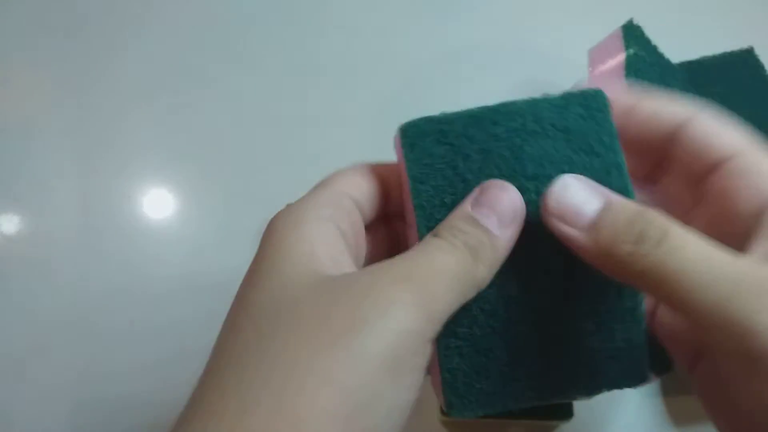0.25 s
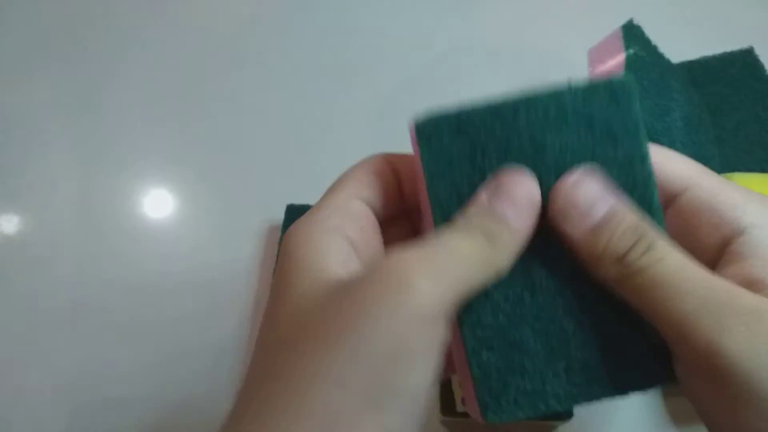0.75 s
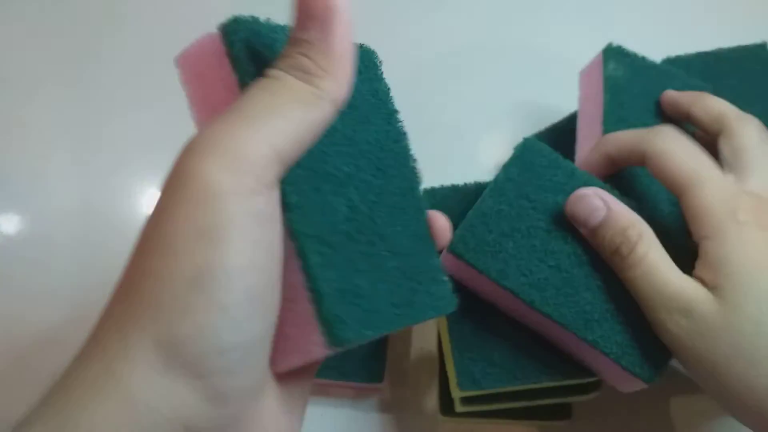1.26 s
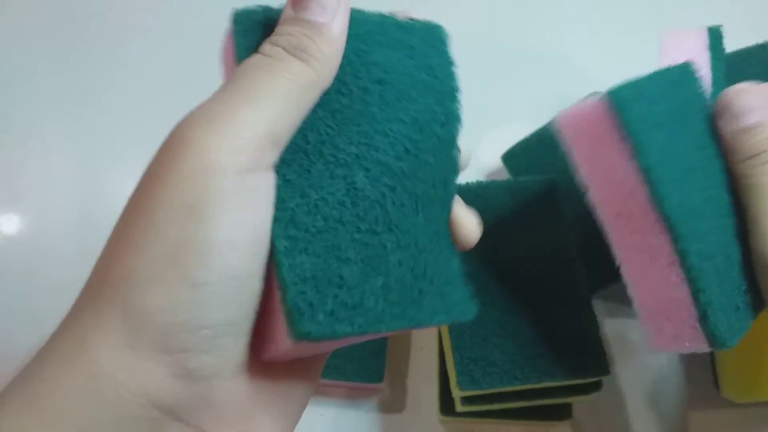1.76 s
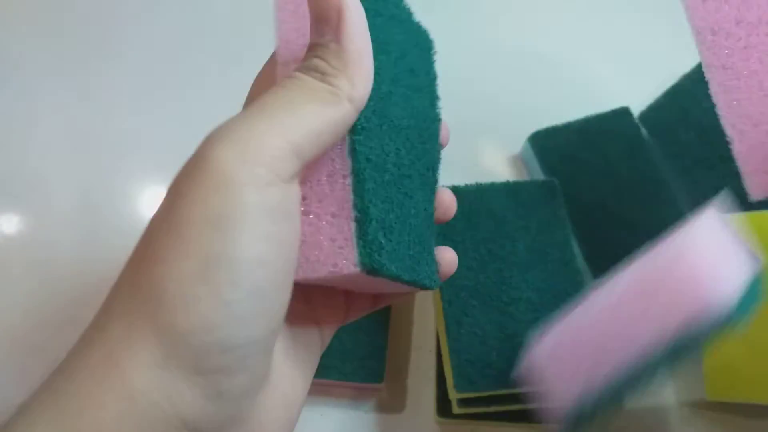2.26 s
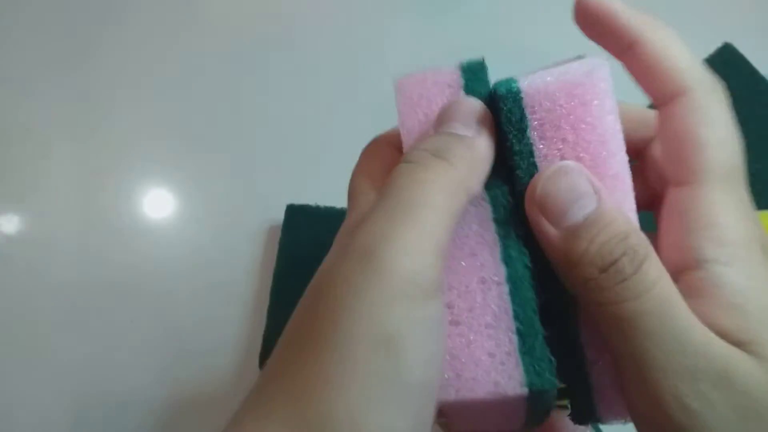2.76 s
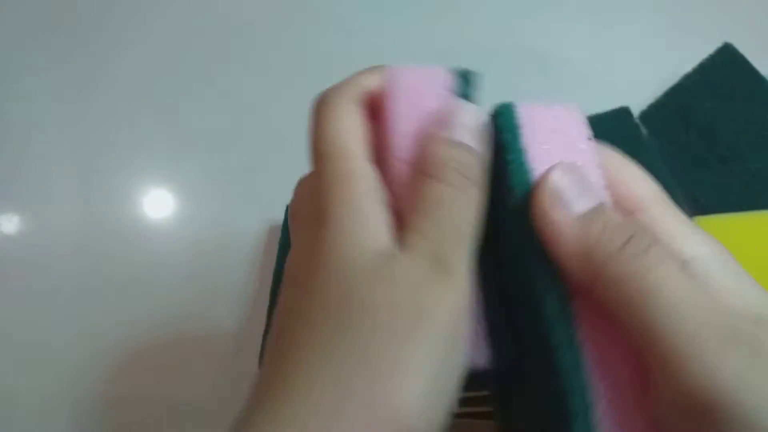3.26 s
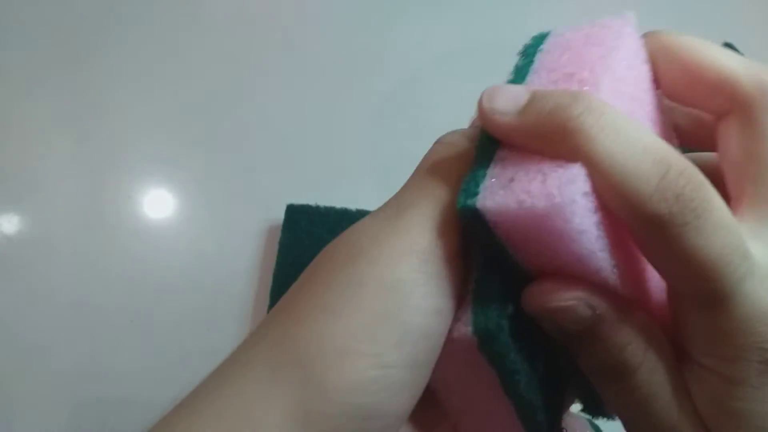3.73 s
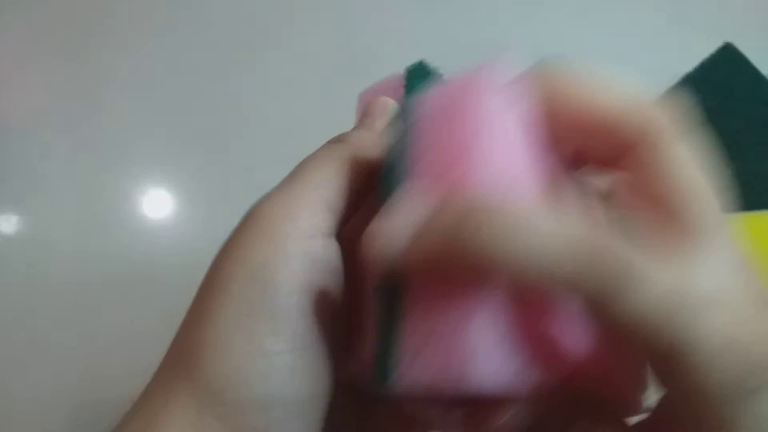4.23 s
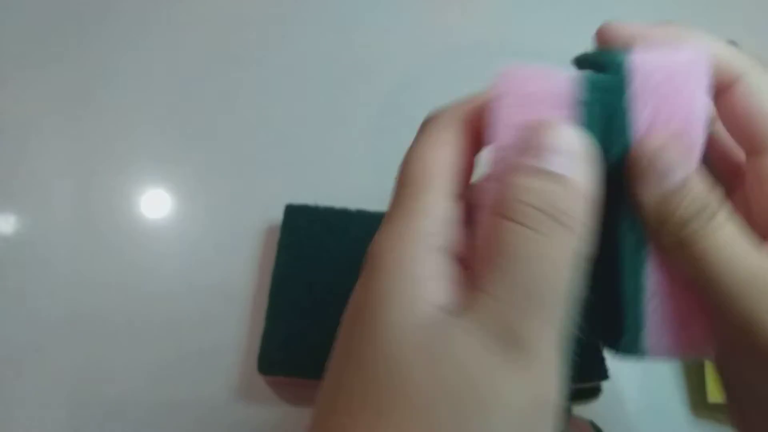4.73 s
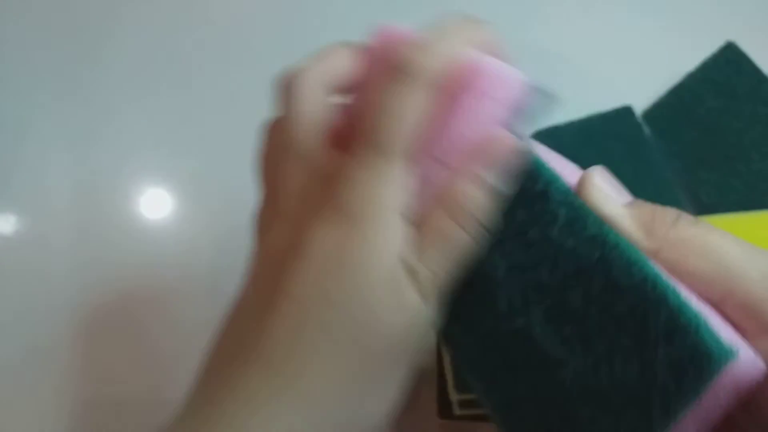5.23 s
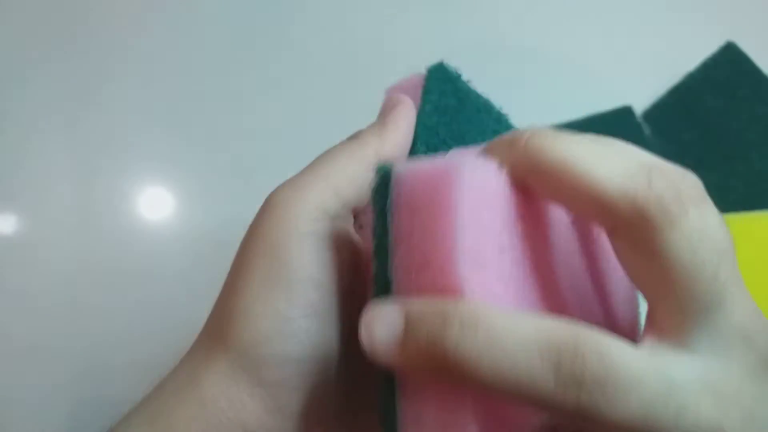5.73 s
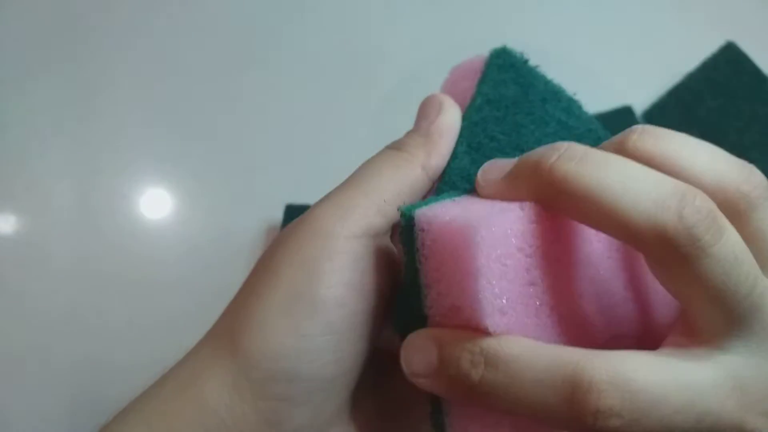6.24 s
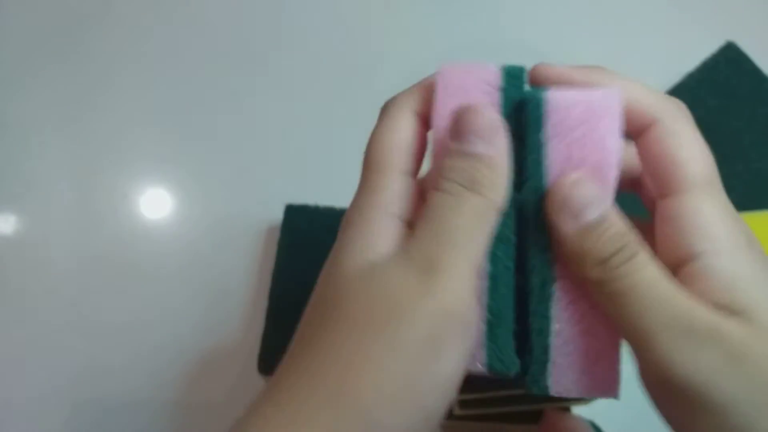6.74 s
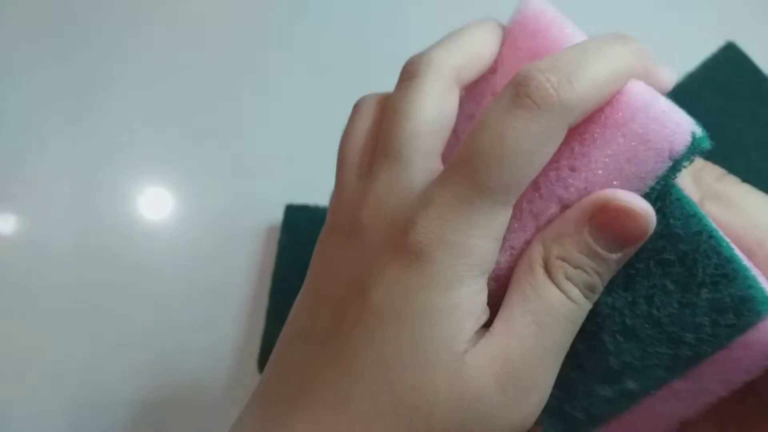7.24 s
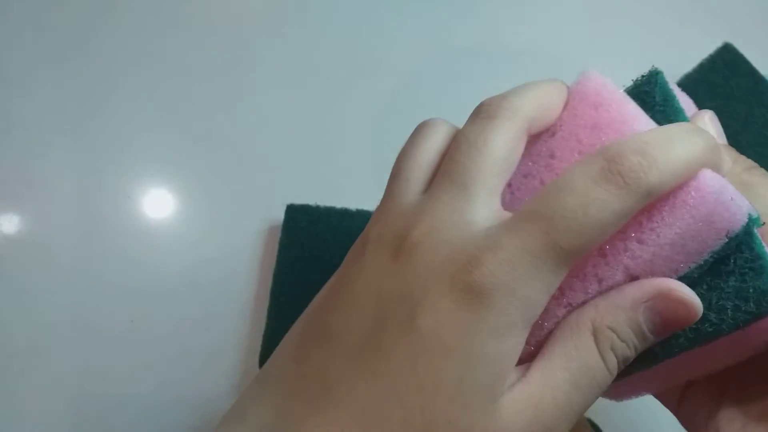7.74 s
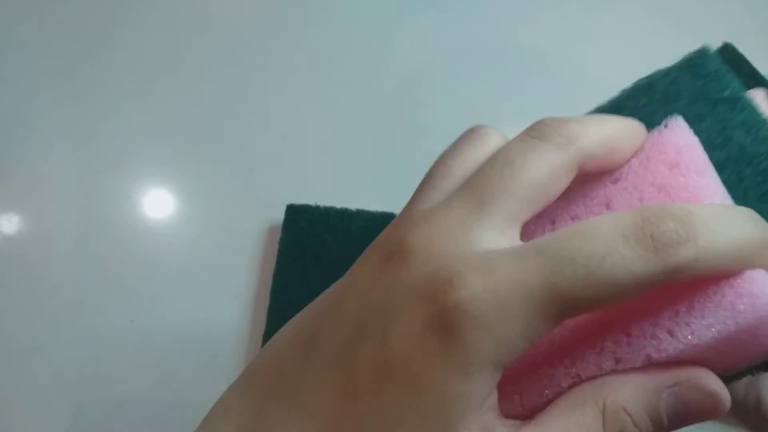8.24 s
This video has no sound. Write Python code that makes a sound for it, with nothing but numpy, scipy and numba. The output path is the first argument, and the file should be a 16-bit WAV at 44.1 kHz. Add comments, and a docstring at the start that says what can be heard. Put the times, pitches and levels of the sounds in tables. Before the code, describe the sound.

Close to the microphone in a small hard room, scrub sponges are handled with a quiet, dry rustle and some dull knocks. After about three seconds, two rough pads start scraping against each other, much louder, in quick uneven strokes. Fast rubs give a dense scratch, while the slower ones near the end break into crisp crackles. A faint ventilation rumble lies underneath.

```python
"""A small hard room, a phone microphone close to two kitchen sponges: they are picked up, pressed
together and rubbed, scouring side on scouring side. Stiff fibres catch and snap free: single ticks when
slow, a dense scratch when fast; the foam adds a hollow body. Fingers brush and bump the sponges now and
then. The room answers faintly, over ventilation rumble, a low hum and a thin whine."""
import sys
import numpy as np
from scipy import signal
from scipy.fft import rfft, irfft
from scipy.io import wavfile
from numba import njit

SR = 44100
rng = np.random.default_rng(int(sys.argv[2]) if len(sys.argv) > 2 else 0)


def put_to_file(sound):
    """Save the sound as 16-bit audio at rate SR, in the file named by the first command-line argument."""
    columns = np.atleast_2d(sound).T  # one column per channel
    safe = np.clip(columns, -1, 1)
    whole_steps = np.round(safe * 32767)
    wavfile.write(sys.argv[1], SR, whole_steps.astype(np.int16))


N = 374409
TIME = np.arange(N) / SR


def undb(db):
    """Decibels to gain."""
    return np.exp(np.asarray(db) * np.log(10) / 20)


def unit(x):
    """Scale to rms 1."""
    return x / np.sqrt(np.mean(x ** 2))


def walk(rate):
    """Random drift that turns about rate times a second; rms 1."""
    return unit(np.interp(TIME * rate, np.arange(N), rng.standard_normal(N)))


def lowpass(x, hz, order=2):
    """Butterworth low-pass."""
    return signal.sosfilt(signal.butter(order, hz, fs=SR, output="sos"), x)


@njit
def bandpass(x, hz, width_hz):
    """State-variable band-pass with a moving centre, gain 1 there."""
    y, band_state, low_state = np.empty(len(x)), 0., 0.
    for i in range(len(x)):
        g, damping = np.tan(np.pi * hz[i] / SR), width_hz / hz[i]
        band = (band_state + g * (x[i] - low_state)) / (1 + g * (g + damping))
        band_state = 2 * band - band_state
        low_state += 2 * g * band
        y[i] = damping * band
    return y


def shelf(x, hz, below_db, above_db):
    """Separate gains below and above a frequency."""
    below = lowpass(lowpass(x, hz, order=3)[::-1], hz, order=3)[::-1]
    return below * undb(below_db) + (x - below) * undb(above_db)


def colour(x, points, size=4096):
    """Ring x through the causal, unit-energy response of a spectrum."""
    hz, db = np.transpose(points)
    bin_hz = np.maximum(np.arange(size // 2 + 1) * SR / size, 1)
    gain = undb(np.interp(np.log(bin_hz), np.log(hz), db))
    cepstrum = irfft(np.log(gain))
    cepstrum[1:size // 2] *= 2  # fold to minimum phase
    cepstrum[size // 2 + 1:] = 0
    response = irfft(np.exp(rfft(cepstrum)))
    return signal.oaconvolve(x, response / np.linalg.norm(response))[:N]


def swell(s, rise_s, hold_s, release_s, sag_db_per_s=7):
    """Level in dB that peaks at s, sags while held, then dies away; rise and release each span 20 dB."""
    early = np.maximum(s - TIME, 0) / rise_s
    late = np.maximum(TIME - s - hold_s, 0) / release_s
    return -20 * (early ** 1.42 + late ** 1.26) - sag_db_per_s * np.clip(TIME - s, 0, hold_s)


# Room tone from the ventilation. Each row: frequency in Hz, relative level in dB.
VENTILATION_SPECTRUM = [(15, -44), (25, -4), (269, 0), (425, -10), (500, -14), (672, -9), (905, -11.5),
                        (1220, -14.5), (1320, -17.5), (1430, -18), (2150, -19), (3880, -21.5), (5090, -27),
                        (7220, -29), (15800, -38.5)]


def ventilation():
    """Moving air fills the room with a rumble and a faint hiss."""
    return colour(rng.standard_normal(N), VENTILATION_SPECTRUM) * undb(-50.5 + 0.4 * walk(4.8))


# A low hum behind the sponges. Each row: peak time in seconds, level in dB, then rise, hold and
# release in seconds.
HUM_SWELLS = [(.85, -52, .5, .75, .2), (4.15, -52.5, .25, 0.56, .35), (4.85, -51.5, .25, .35, .35)]


def hum():
    """A wavering low hum comes and goes under a soft, unsteady drone."""
    low_db = np.max([db + swell(s, *shape) for s, db, *shape in HUM_SWELLS], axis=0)
    low_hz = 56.5 + 1.3 * walk(9)
    low = np.sin(2 * np.pi * np.cumsum(low_hz) / SR) * undb(low_db + 1.5 * walk(6.9))
    drone_hz = 157 + 6 * walk(25)
    drone = np.sin(2 * np.pi * np.cumsum(drone_hz) / SR) * undb(-59 + 5.8 * walk(11))
    return low + drone


# A whine far down in the room tone. Each row: frequency in Hz, rms level in dB.
WHINE_TONES = [(8258, -85), (8559, -85), (8856, -85), (9157, -84), (9518, -85), (9814, -84), (10115, -83),
               (10411, -84), (10713, -83), (11014, -85), (11310, -85), (11612, -86), (14664, -89),
               (15262, -88)]


def whine():
    """Steady high tones merge into one thin whine."""
    return sum(np.sqrt(2) * undb(db) * np.sin(2 * np.pi * (hz * TIME + rng.random()))
               for hz, db in WHINE_TONES)


def room(x, t60_s, wet_db, dull_hz, build_s):
    """The hard walls send a diffuse, duller echo back to the microphone."""
    age = TIME[:SR]
    envelope = undb(-60 * age / t60_s) * (1 - np.exp(-age / build_s))
    tail = lowpass(rng.standard_normal(SR) * envelope, dull_hz)
    return undb(wet_db) * signal.oaconvolve(x, tail / np.linalg.norm(tail))[:N]


# The ring of a bump. Each row: frequency in Hz, relative level in dB, seconds to fall 60 dB.
BUMP_MODES = [(78, -23, .08), (163, 6, 0.024), (338, -4, 0.027), (546, 8, 0.033), (800, 16, 0.02),
              (1170, 15, 0.019)]
# Soft bumps near the microphone. Each row: start in seconds, peak level in dB, treble cutoff in Hz.
BUMPS = [(0.243, -35, 131), (2.229, -27.5, 1250), (2.538, -26, 423), (2.597, -29, 260), (3.94, -29, 105),
         (4.310, -37, 300)]


def bumps():
    """Fingers and sponges knock together; the softer the contact, the fewer modes it reaches."""
    out, age = np.zeros(N), TIME[:SR // 5]
    ring = sum(undb(db - 60 * age / t60) * np.sin(2 * np.pi * hz * age) for hz, db, t60 in BUMP_MODES)
    for s, db, cutoff_hz in BUMPS:
        knock = lowpass(ring, cutoff_hz, order=4)
        out[int(s * SR):][:len(age)] += undb(db) * knock / np.abs(knock).max()
    return out


def fibres(per_s, scatter_db):
    """Random fibre releases of uneven size, with mean power 1 at any rate."""
    chance = np.clip(per_s / SR, 1 / SR, 1)
    released = rng.random(N) < chance
    return unit(released * undb(scatter_db * rng.standard_normal(N)) / np.sqrt(chance))


def sliding(level_db, per_s, growth_db, clump_db, smooth_db):
    """Faster sliding frees more fibres and runs evenly; slow sliding sticks and frees them in clumps."""
    speed = undb(growth_db * (level_db + 29.5) / 10)  # 1 at an ordinary stroke
    depth_db = clump_db * (0.32 + 0.61 / (1 + (speed * undb(smooth_db)) ** 4))
    catch_db = depth_db * unit(walk(600) + 0.34 * walk(170))
    clumps = undb(catch_db - depth_db ** 2 * np.log(10) / 20)  # clumping keeps the mean power
    return fibres(per_s * speed, scatter_db=3.5) * clumps * undb(level_db)


def bursts(rows, rise_s, gain_db):
    """Envelope of short avalanches of fibres: quick rise, brief hold, fast end."""
    power = np.zeros(N)
    for s, db, length_s in rows:
        age = TIME[:min(SR // 5, N - int(s * SR))]
        shape = (1 - np.exp(-age / rise_s)) * np.exp(-(age / length_s) ** 2)
        power[int(s * SR):][:len(age)] += (undb(db + gain_db) * shape) ** 2
    return np.sqrt(power)


# Tiny creaks, close up. Each row: start in seconds, relative level in dB, length in seconds, pitch in Hz.
CREAKS = [(0.851, -39, .004, 2730), (1.15, -31.5, 0.0035, 2930), (1.83, -45.5, 0.033, 2770),
          (7.395, -26, .004, 2700), (7.413, -33.5, 0.01, 1600)]


def creaks():
    """A bundle of fibres judders through one narrow resonance."""
    out, judder = np.zeros(N), fibres(12000, scatter_db=5)
    for s, db, length_s, hz in CREAKS:
        ring = unit(bandpass(judder, np.full(N, float(hz)), width_hz=300.0))
        out += ring * bursts([(s, db, length_s)], rise_s=0.0013, gain_db=-3.5)
    return out


# Fingertip scratch and skin brush, heard close. Each row: frequency in Hz, relative level in dB.
SCRATCH_SPECTRUM = [(60, -3), (200, -9.5), (800, -1.5), (1600, -7.5), (2300, -4), (3000, -1), (3700, -3.5),
                    (4500, -4), (5800, -15.5), (15800, -50)]
SKIN_SPECTRUM = [(4500, -20), (6500, -1.5), (8000, 4), (11000, 0.5), (15800, -8), (18000, -40)]
# A finger shifts on one sponge. Each row: peak time in seconds, relative scratch level in dB, rise and
# release in seconds, relative skin level in dB.
FINGER_SHIFTS = [ (0.0, -53.5, .02, .06, -64), (0.11, -58, 0.055, .06, -66), (0.21, -59, .06, 0.074, -67),
                 (0.29, -51, .012, .015, -70), (0.365, -49, 0.013, .045, -66),
                 (0.53, -56.5, 0.066, .14, -56.5), (0.84, -49, 0.12, 0.056, -58),
                 (0.997, -45.5, 0.033, 0.045, -68), (1.063, -52.5, 0.024, 0.041, -78),
                 (1.138, -50.5, 0.027, 0.035, -78), (1.265, -53.5, 0.093, 0.082, -65),
                 (1.42, -51, 0.068, .065, -63), (1.5, -55.5, .04, 0.1, -66), (1.62, -50, 0.035, 0.1, -66),
                 (1.752, -50.5, 0.053, 0.028, -62), (1.835, -51, 0.065, 0.1, -66),
                 (1.947, -51, .06, 0.11, -64), (2.022, -48.5, .02, 0.052, -63),
                 (2.085, -51.5, 0.084, 0.13, -58.5), (2.48, -55.5, .07, .08, -67),
                 (2.628, -45, 0.062, 0.072, -66)]


def fingers(hold_s=0.006):
    """Fingertips scratch lightly over one pad; dry skin adds an airy brush."""
    scratch_power, skin_power = undb(-66) ** 2, undb(-67.5) ** 2  # a held sponge still rustles
    for s, scratch_db, rise_s, release_s, skin_db in FINGER_SHIFTS:
        swell_db = swell(s, rise_s, hold_s, release_s).clip(-120)
        scratch_power += undb(scratch_db + swell_db) ** 2
        skin_power += undb(skin_db + swell_db) ** 2
    scratch_db, skin_db = 10 * np.log10(scratch_power) + 0.5, 10 * np.log10(skin_power) - 0.5
    scratch = sliding(scratch_db, per_s=11000, growth_db=3, clump_db=2.5, smooth_db=1)
    brush = sliding(skin_db, per_s=13000, growth_db=4, clump_db=3.5, smooth_db=0)
    return colour(scratch, SCRATCH_SPECTRUM) + colour(brush, SKIN_SPECTRUM)


# One pad slides over the other, right at the microphone. Each row: time of full speed in seconds, level
# in dB, then rise, hold and release in seconds, foam body and fibre-tip sizzle in dB relative to the
# scratch, ring of the fully stretched mat in Hz.
STROKES = [ (2.756, -48.5, .02, 0.016, 0.087, -0.5, -10, 3550),
           (2.934, -29.5, 0.13, 0.074, 0.091, -10, -16.5, 3100),
           (3.136, -30, 0.14, 0.076, 0.091, -10, -15.5, 3500),
           (3.25, -25, .03, 0.061, 0.15, -10.5, -16, 4200),
           (3.39, -30.5, 0.14, 0.046, .08, -13.5, -23, 3150),
           (3.467, -32, 0.077, 0.045, .06, -6, -16.5, 3520),
           (3.548, -29.5, 0.054, 0.037, 0.079, -8.5, -16, 3500),
           (3.747, -32, 0.06, 0.023, 0.042, -7.5, -15, 3080),
           (3.824, -33.5, 0.018, 0.016, .05, -8, -18, 3700),
           (3.924, -21.5, 0.07, .08, 0.022, -9.5, -16.5, 3700),
           (4.315, -49.5, .015, .03, .07, -10, -15, 3550),
           (4.396, -36, 0.044, .015, 0.061, -8.5, -16.5, 4000),
           (4.575, -22.5, 0.086, 0.058, .19, -9, -17, 3040),
           (4.883, -33, .06, 0.029, 0.076, -11, -16, 3960), (4.978, -31, 0.11, 0.027, .07, -8, -13.5, 2840),
           (5.089, -27, 0.052, 0.031, 0.02, -13.5, -15, 3600),
           (5.197, -23.5, 0.07, 0.052, 0.054, -15, -15, 3600),
           (5.26, -20.5, 0.055, 0.076, 0.048, -9.5, -16.5, 3930),
           (5.751, -39, 0.051, 0.088, .08, -5.5, -16.5, 3550),
           (5.878, -38, 0.069, .03, 0.058, -7, -15, 3100),
           (5.989, -38.5, 0.055, 0.038, 0.057, -8.5, -16, 3830),
           (6.136, -38.5, 0.066, 0.016, 0.042, -6.5, -14.5, 3700),
           (6.185, -33, .02, 0.044, .07, -8.5, -15.5, 3520),
           (6.431, -26.5, 0.064, 0.068, 0.073, -10, -15.5, 3600),
           (6.654, -33, 0.14, .06, 0.19, -10.5, -16, 3650),
           (6.819, -33, 0.1, 0.035, 0.11, -13, -17.5, 3630),
           (7.002, -27.5, 0.2, 0.043, 0.17, -9.5, -17, 3780),
           (7.256, -40, .08, 0.033, .05, -7.5, -14.5, 3700),
           (7.328, -35.5, .015, 0.045, 0.06, -7, -15.5, 3480),
           (7.433, -42, .04, .02, .045, -10, -12.5, 3450),
           (7.478, -41.5, .02, 0.0071, 0.11, -5, -14.5, 3580),
           (7.61, -45, 0.022, .025, .05, -7.5, -13, 3470),
           (7.657, -28.5, 0.016, .012, .025, -8.5, -17, 3570),
           (7.703, -28, 0.016, 0.019, 0.076, -8, -15, 3680),
           (7.937, -32.5, .06, 0.082, 0.066, -9, -13, 3520),
           (8.087, -45, .012, 0.0085, 0.12, -10, -13, 3550),
           (8.22, -31, 0.055, 0.061, .15, -7.5, -13.3, 3700)]


def strokes(octaves_per_db=0.02):
    """Sliding level, foam and sizzle levels and mat pitch; in an overlap the stronger stroke leads."""
    power, foam, tips, mat = 0, 0, 0, 0
    for s, db, rise_s, hold_s, release_s, foam_db, tips_db, mat_hz in STROKES:
        slowing_db = swell(s, rise_s, hold_s, release_s).clip(-120)
        share = undb(db + slowing_db) ** 2
        power += share
        foam += share * foam_db
        tips += share * tips_db
        mat += share * mat_hz * 2 ** (octaves_per_db * slowing_db)  # slower: slacker and lower
    return 10 * np.log10(power), foam / power, tips / power, mat / power


def sticking(rows, hold_s, hush_db):
    """The sliding quietens while fibres hold, just before they let go."""
    gain, lead_s = np.ones(N), TIME[:SR // 10][::-1]
    dip = undb(hush_db * np.exp(-(lead_s / hold_s) ** 2))
    for s, *_ in rows:
        gain[int(s * SR) - len(dip):int(s * SR)] *= dip
    return gain


# A tuft holds, then tears loose. Each row: start in seconds, relative level in dB, length in seconds.
TUFT_SLIPS = [(2.619, -27, 0.026), (2.837, -39, 0.018), (3.215, -11.5, 0.02), (3.248, -27, 0.017),
              (3.498, -12.5, 0.014), (3.53, -15.5, 0.035), (3.696, -18, 0.011), (3.732, -30, 0.02),
              (3.824, -13, 0.025), (3.875, -10, 0.017), (4.305, -31, 0.036), (5.187, -10, 0.011),
              (5.732, -26, 0.015), (5.9727, -18.5, 0.012), (6.005, -18, 0.007), (6.179, -12.5, 0.016),
              (6.217, -13, 0.014), (6.3924, -7.5, 0.01), (6.63, -26, 0.02), (7.327, -18, 0.018),
              (7.3756, -14, 0.011), (7.408, -18.5, 0.014), (7.4848, -8.5, 0.0084), (7.654, -9, 0.022),
              (7.695, -12.5, 0.018), (7.863, -22, 0.013), (8.082, -12.5, 0.0081), (8.205, -15, 0.019)]
# One stiff fibre snaps, a sharp tick this close. Each row: start in seconds, relative level in dB.
FIBRE_SNAPS = [(0.366, -35), (0.523, -36), (1.746, -37), (1.8385, -34), (2.025, -35), (2.079, -33.5),
               (2.848, -24), (3.1057, -24), (3.2193, -15), (3.4268, -18), (3.6314, -19), (3.729, -18),
               (5.883, -31), (6.132, -23), (6.2316, -16), (6.268, -23), (7.2987, -25), (7.3339, -20),
               (7.365, -28), (7.3904, -28), (7.575, -27), (7.59, -24), (7.595, -24), (7.6091, -20),
               (7.64, -19), (7.657, -17), (7.78, -18.5), (8.009, -17.5)]


def scouring(rub_db, snap_s=0.0016):
    """The scouring sides drive each other: a stream of releases, broken by slips and snaps."""
    rub = sliding(rub_db, per_s=9000, growth_db=4, clump_db=4.5, smooth_db=4.5)
    rub *= sticking(TUFT_SLIPS, hold_s=0.011, hush_db=-5)
    rub *= sticking(FIBRE_SNAPS, hold_s=0.016, hush_db=-1)
    slips = bursts(TUFT_SLIPS, rise_s=0.004, gain_db=-14.5) * fibres(9000, scatter_db=3)
    snap_rows = [(s, db, snap_s) for s, db in FIBRE_SNAPS]
    snaps = bursts(snap_rows, rise_s=0.00063, gain_db=-2.5) * fibres(36000, scatter_db=2.5)
    return rub + slips + snaps


# Scouring pad, fibre tips and foam, heard close. Each row: frequency in Hz, relative level in dB.
PAD_SPECTRUM = [(820, -33), (1400, -10), (1580, -1), (1880, -5), (2110, -0.5), (2500, -0.5), (2970, -1),
                (3960, -3), (4400, 0), (4990, -2), (5750, -12.5), (6200, -22), (8060, -57), (13600, -120)]
TIPS_SPECTRUM = [(3530, -40), (6000, -0.5), (7970, -0.5), (8850, -5.5), (10700, -7.5), (13400, -18.5),
                 (15100, -16), (15800, -19)]
FOAM_SPECTRUM = [(32, -37), (55, -28), (86, -10.5), (130, -5.5), (162, -7), (337, -4.5), (381, -6.5),
                 (546, -6.5), (594, -6.5), (762, -5), (1000, -6.5), (1080, -5.5), (1500, -4), (1950, -32),
                 (3300, -120)]
# The grip changes as the sponges are turned over in front of the microphone. Each row: time in seconds,
# pitch of the cupped hands' hollow in Hz, gain of the highest treble in dB.
GRIPS = [(3.0, 796, 0), (3.3, 720, -2), (3.48, 664, 1), (3.7, 810, 4), (4.35, 770, 2), (4.6, 890, 4.5),
         (5.0, 754, -5), (5.3, 630, -5), (5.8, 840, 5), (6.4, 830, 3), (6.85, 666, -1), (7.6, 805, 2.5),
         (7.95, 690, -2), (8.3, 610, 0)]


def sponges(cup_hz=422, cup_db_per_octave=-15, screen_hz=11000):
    """Every release rings the pad, the fine fibre tips and the foam behind them."""
    rub_db, foam_db, tips_db, mat_hz = strokes()
    grip_s, grip_hz, grip_db = np.transpose(GRIPS)
    hollow_hz, top_db = np.interp(TIME, grip_s, grip_hz), np.interp(TIME, grip_s, grip_db)
    # pad, tips and foam crackle with the same timing; random signs keep their bands from cancelling
    to_pad, to_tips, to_foam = scouring(rub_db) * rng.choice([-1, 1], (3, N))
    pad = colour(to_pad, PAD_SPECTRUM)
    pad = undb(-4) * pad + undb(-5) * bandpass(pad, np.clip(mat_hz, 2700, 6000), width_hz=1980.0)
    foam = colour(to_foam, FOAM_SPECTRUM)
    foam = undb(-2.5) * foam + undb(-0.5) * bandpass(foam, hollow_hz, width_hz=237.0)
    # a deeper hollow swells the bass; the hands screen the highest treble
    foam = shelf(foam, cup_hz, below_db=cup_db_per_octave * np.log2(hollow_hz / 780), above_db=0)
    tips = shelf(colour(to_tips, TIPS_SPECTRUM), screen_hz, below_db=0, above_db=top_db)
    return pad + tips * undb(tips_db) + foam * undb(foam_db)


def scene():
    """Sponges and hands close to one microphone, the room faint behind them."""
    near = sponges() + fingers() + creaks() + bumps()
    echo = room(near, t60_s=0.47, wet_db=-25, dull_hz=5670, build_s=0.0014)
    return (near + echo + ventilation() + hum() + whine())[None]


def record(dry, low_cut_hz=51.7, top_hz=15850):
    """The phone cuts the deep bass and the top."""
    thin = signal.sosfilt(signal.butter(6, low_cut_hz, "highpass", fs=SR, output="sos"), dry)
    return signal.sosfilt(signal.ellip(10, .2, 70, top_hz, fs=SR, output="sos"), thin)


dry = scene()
out = record(dry)
put_to_file(out)
```